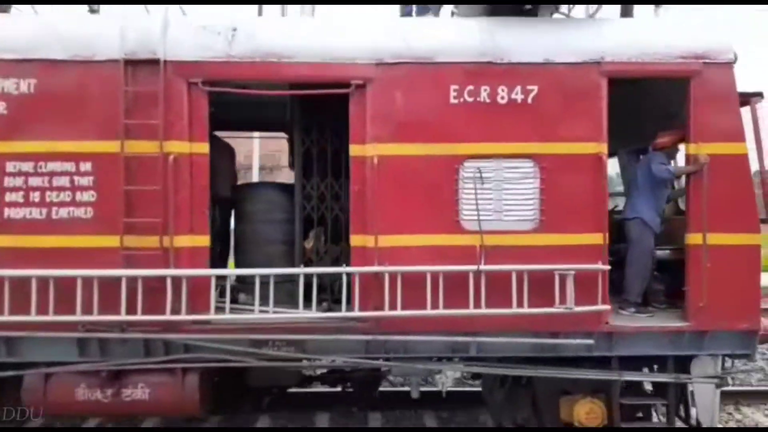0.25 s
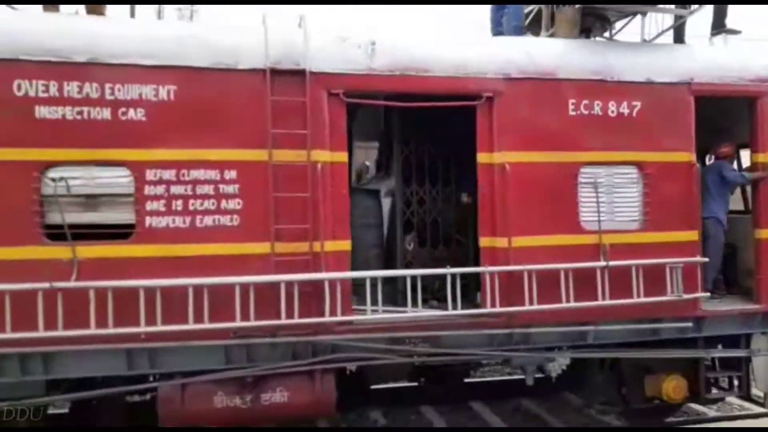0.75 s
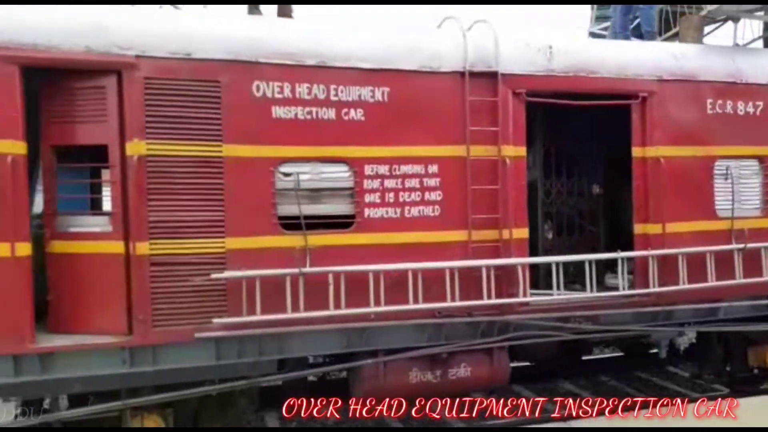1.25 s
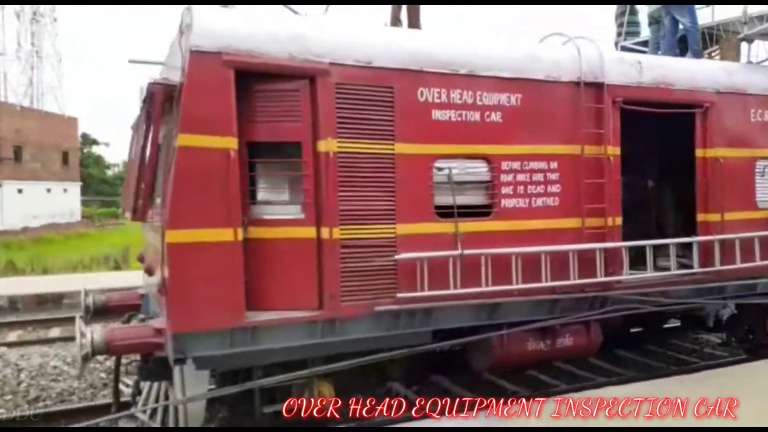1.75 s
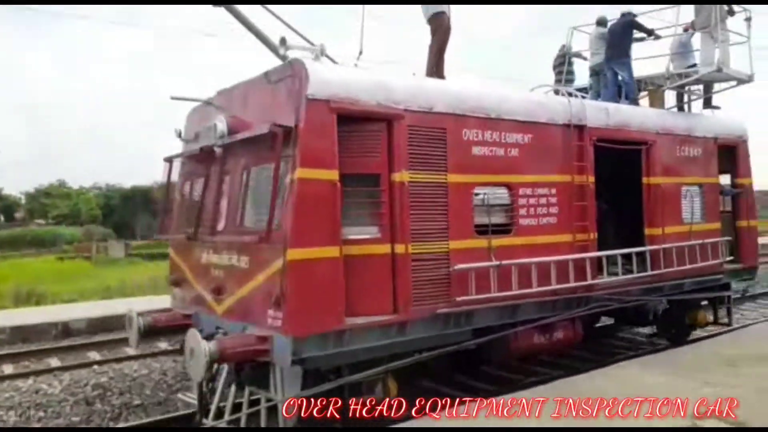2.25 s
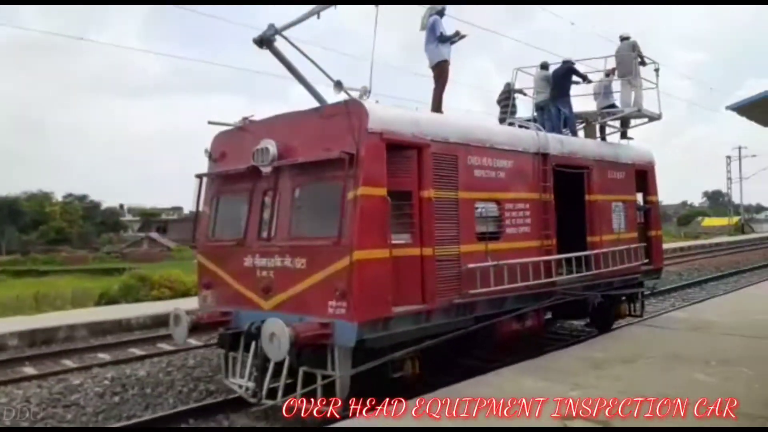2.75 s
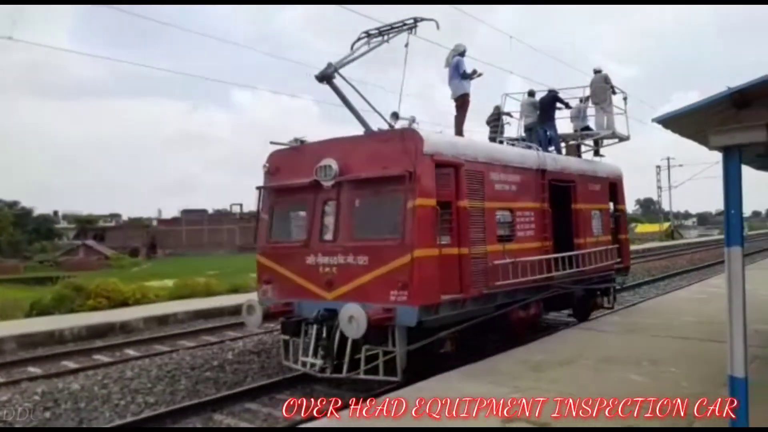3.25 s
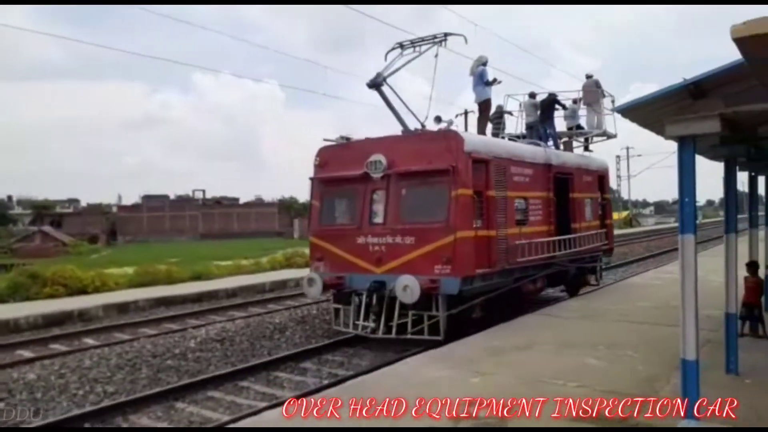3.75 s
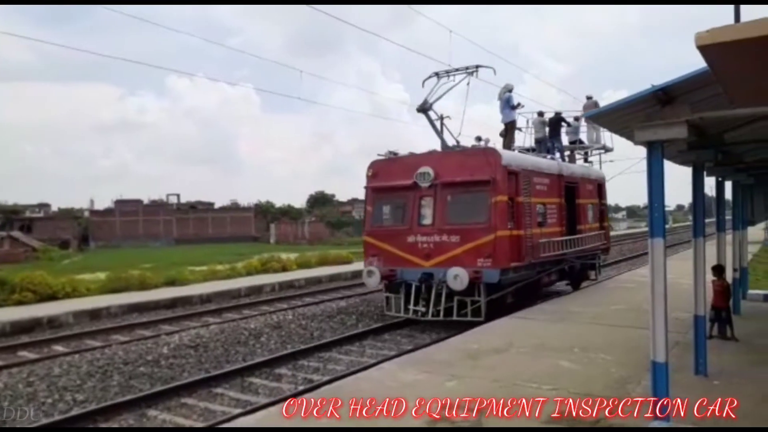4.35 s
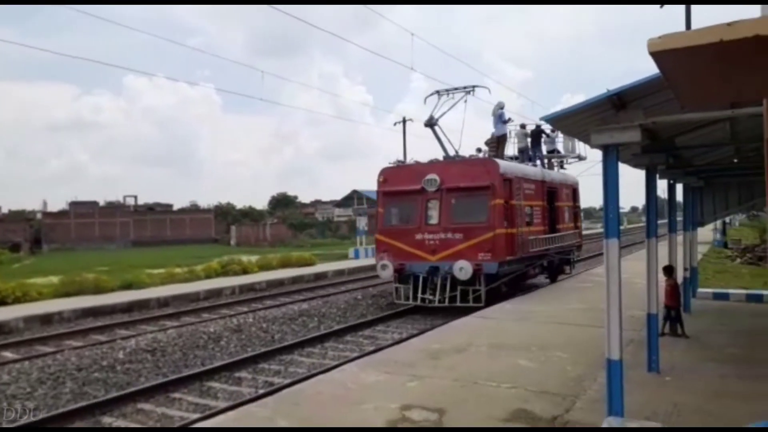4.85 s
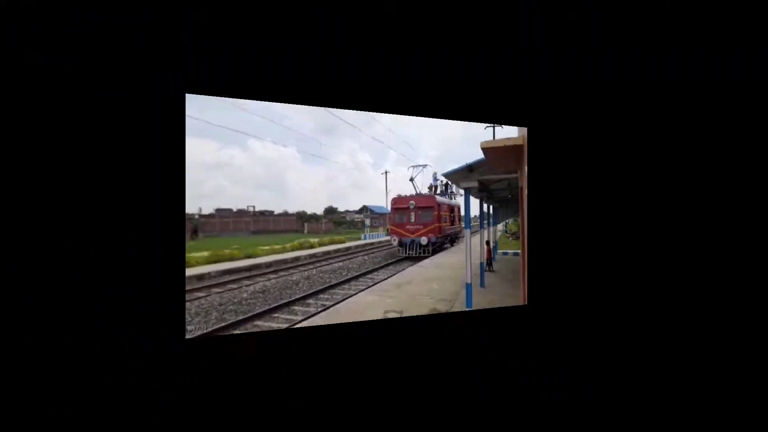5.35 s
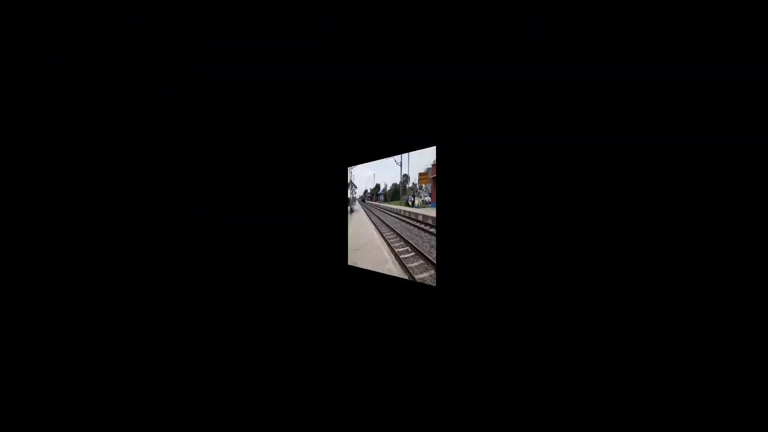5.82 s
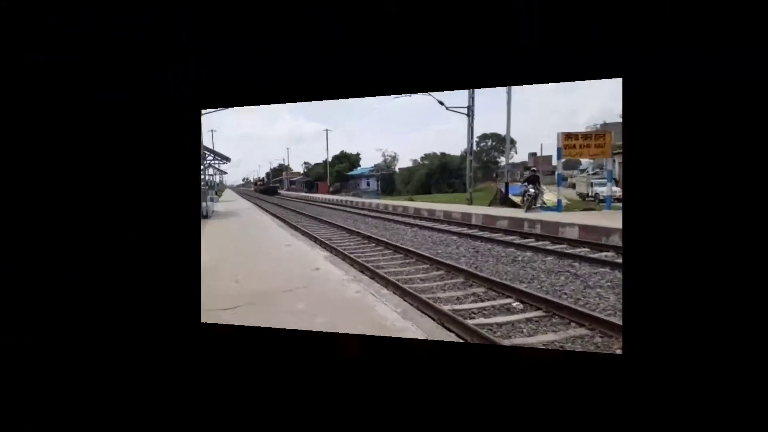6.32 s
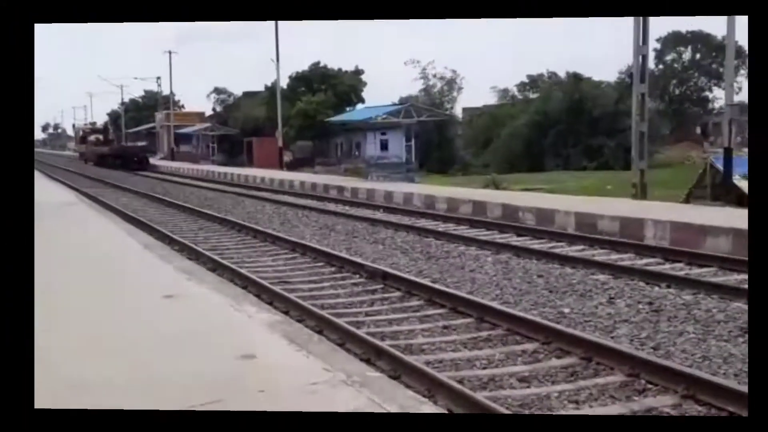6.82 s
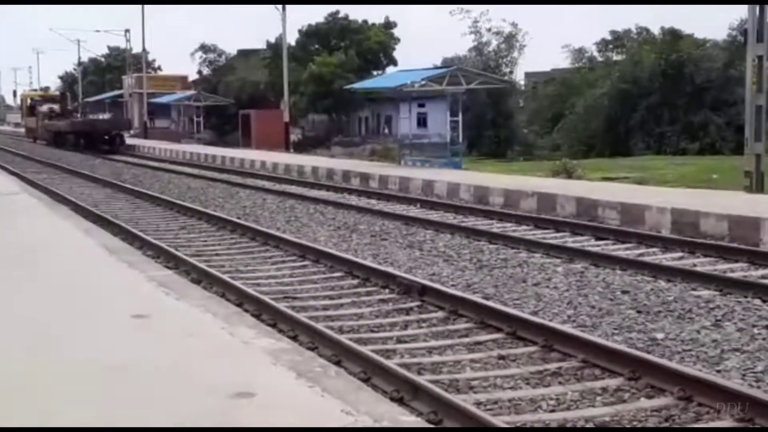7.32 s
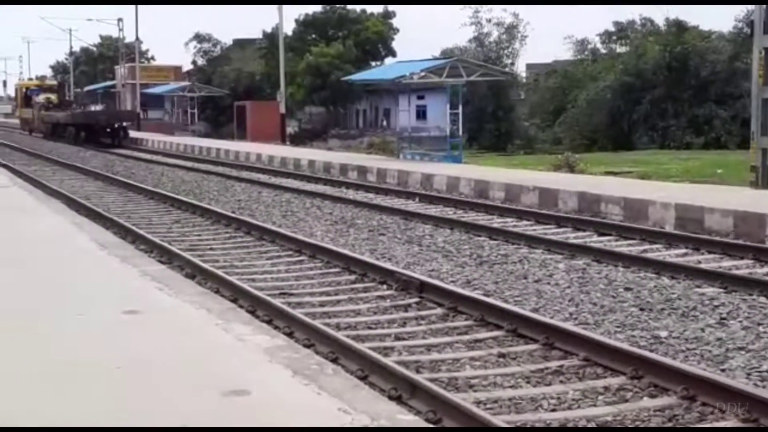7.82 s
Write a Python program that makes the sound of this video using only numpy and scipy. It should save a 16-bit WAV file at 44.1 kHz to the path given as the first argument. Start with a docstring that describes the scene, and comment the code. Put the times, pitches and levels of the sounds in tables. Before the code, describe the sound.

A clattering diesel rail vehicle passes close and recedes into silence, before a distant horn sounds twice over a faint, growing rumble.

```python
"""On a railway platform, a six-cylinder diesel inspection car rolls past and away. Its firing
pulses make the exhaust throb, the engine clatters, and loose steel fittings rattle and tick in
step with the crankshaft. The car fades to silence; then a second machine fades in far down the
line, a horn sounds twice, and the rumble grows as the machine approaches."""
import sys
import numpy as np
from scipy import signal
from scipy.fft import rfft, irfft, next_fast_len
from scipy.io import wavfile
from scipy.ndimage import uniform_filter1d, map_coordinates

SR = 44100
rng = np.random.default_rng(int(sys.argv[2]) if len(sys.argv) > 2 else 0)


def persist_wave(psi):
    """Save psi, clipped to +-1, as 16-bit WAV."""
    counts = np.round(np.clip(psi, -1, 1) * 32767).astype(np.int16)
    wavfile.write(sys.argv[1], SR, np.atleast_2d(counts).T)


N = 356328
TIME = np.arange(N) / SR
TURN_S = .0569  # one crankshaft turn: three firings, half an engine cycle


def amp(db):
    """Decibels to gain."""
    return 10 ** (np.asarray(db) / 20)


def unit(x):
    """Scale to rms 1."""
    return x / np.sqrt(np.mean(x ** 2) + 1e-20)


def along(points, hz):
    """Read (freq_hz, value) points on a log frequency axis."""
    freqs, values = np.transpose(points)
    return np.interp(np.log(hz + 1), np.log(freqs + 1), values)


def curves(rows):
    """One automation curve for each column after the time."""
    times, *columns = np.transpose(rows)
    return [np.interp(TIME, times, column) for column in columns]


def wobble(rate_hz):
    """A smooth random curve through rate_hz points a second."""
    return map_coordinates(rng.standard_normal(int(N * rate_hz / SR) + 4), [TIME * rate_hz])


def filtered(x, response):
    """Equalise x with a gain that depends on frequency."""
    size = next_fast_len(N + SR // 4)
    return irfft(rfft(x, size) * response(np.fft.rfftfreq(size, 1 / SR)), size)[..., :N]


def rush(colour, width, lean, patchy_db):
    """Coloured stereo noise whose bands flicker by about patchy_db; its mid has rms 1."""
    bands = signal.stft(rng.standard_normal((2, N)), nperseg=1024)[2]
    patches = uniform_filter1d(rng.standard_normal(bands.shape[1:]), size=4, axis=0)
    patches = unit(uniform_filter1d(patches, size=10, axis=1))
    mid, side = signal.istft(bands * amp(patchy_db * patches), nperseg=1024)[1][:, :N]
    mid = filtered(mid, lambda hz: amp(along(colour, hz)))
    side = filtered(side, lambda hz: amp(along(colour, hz) + along(width, hz)))
    stereo = np.array([mid + side, mid - side])
    stereo = filtered(stereo, lambda hz: amp(np.outer([.5, -.5], along(lean, hz))))
    return stereo / np.std(stereo.mean(axis=0))


def ring(pitch_hz, width_hz):
    """Noise ringing in one resonance, at rms 1."""
    noise = rng.standard_normal(N)
    return unit(filtered(noise, lambda hz: 1 / (1 + (2 * (hz - pitch_hz) / width_hz) ** 2)))


def resonances(rows):
    """A bank of noisy resonances from (pitch_hz, width_hz, level_db) rows."""
    return sum(amp(db) * ring(hz, width_hz) for hz, width_hz, db in rows)


def bursts(blows, attack_s, t60_s):
    """Envelope of (start_s, level_db) blows that rise quickly and die away."""
    power, t = np.zeros(N + SR), np.arange(SR // 2) / SR
    for start, db in blows:
        blow = amp(db - 60 * t / t60_s) * (1 - np.exp(-t / attack_s))
        power[max(0, round(start * SR)):][:len(t)] += blow ** 2
    return np.sqrt(power[:N])


def throb(cycles, depth, sharpness):
    """A gain of rms 1 that jumps up once a cycle and falls back."""
    return unit(1 + depth * np.exp(-sharpness * (cycles % 1)))


def far_tone(hz, waver_rad, waver_hz):
    """A sine on a pitch curve, its phase shaken by the air on the way."""
    return np.sin(2 * np.pi * np.cumsum(hz) / SR + waver_rad * wobble(waver_hz))


def held(notes, sag_hz_per_s, waver_rad, waver_hz, swell_s=.16):
    """Far tones that swell, hold and fade while their pitch sags."""
    out = np.zeros(N)
    for start, end, hz, db in notes:
        swell = np.clip(np.minimum(TIME - start, end - TIME) / swell_s, 0, 1)
        out += amp(db) * swell * far_tone(hz - sag_hz_per_s * (TIME - start), waver_rad, waver_hz)
    return out


# Faint whines down the line: start_s, peak_s, end_s, pitch_hz, width_hz, level_db
WHINES = [(6.15, 6.85, 7.4, 2285, 45, -71), (6.3, 6.8, 7.15, 4580, 50, -81),
          (5.9, 6.0, 6.17, 1468, 10, -75)]


def whines():
    """Thin, distant bands of noise that swell and fade."""
    return sum(amp(db) * np.interp(TIME, [start, peak, end], [0, 1, 0]) * ring(hz, width_hz)
               for start, peak, end, hz, width_hz, db in WHINES)


# Brief scrapes: peak_s, spread_s, pitch_hz, width_hz, level_db
SCRAPES = [(7.091, 0.045, 11900, 4500, -61), (7.316, 0.056, 4600, 2500, -55.5)]


def scrapes():
    """Short swells of hiss, unrelated in the two ears."""
    out = np.zeros((2, N))
    for peak, spread, hz, width_hz, db in SCRAPES:
        swell = np.exp(-((TIME - peak) / spread) ** 2)
        out += amp(db) * swell * np.array([ring(hz, width_hz), ring(hz, width_hz)])
    return out


# Stereo width of the far machine: freq_hz, side_minus_mid_db
FAR_WIDTH = [(60, -15), (200, -19), (380, -12), (700, -4.5), (1290, 0.5), (4400, 0)]
# Its balance: freq_hz, left_minus_right_db
FAR_BALANCE = [(60, -4), (110, 1.5), (200, 2), (380, 0.0), (700, 2), (1290, 1.5), (2380, 1.5), (4400, 1.5),
               (8120, 7), (15000, -0.5)]


def far_noise(colour, patchy_db):
    """Noise placed in the far machine's stereo image."""
    return rush(colour, FAR_WIDTH, FAR_BALANCE, patchy_db)


# EQ curves of the far engine's rumble, booming body, wheels and hiss: freq_hz, level_db
FAR_RUMBLE_EQ = [(28, -36), (42, -10.5), (65, -4.5), (85, -2), (120, -4.5), (150, -10.5), (185, -5),
                 (215, -19), (300, -32), (600, -71)]
FAR_BODY_EQ = [(140, -26.5), (215, -6), (265, -3.5), (325, 2.5), (390, -2), (445, -8.5), (540, -10.5),
               (680, -13), (1100, -53.5)]
FAR_WHEELS_EQ = [(290, -31), (500, -4), (535, -7), (681, -9), (891, -2), (1240, -5), (1340, -3.5),
                 (1590, -10), (2270, -10.5), (2520, -16), (3030, -24.5), (5000, -18.5), (6500, -54),
                 (11000, -120)]
FAR_HISS_EQ = [(1650, -35), (2800, -1.5), (3570, -3), (4940, -8.5), (5540, -4.5), (7430, -12),
               (9760, -10.5), (12000, -7), (14500, -9), (15600, -20)]


def far_running():
    """Uneven engine rumble, a body that booms more as it nears, wheels on rails, hiss and exhaust."""
    rumble = amp(3.5 + .5 * wobble(11)) * far_noise(FAR_RUMBLE_EQ, patchy_db=1.5)
    body = amp(-1.5 * (TIME[-1] - TIME)) * far_noise(FAR_BODY_EQ, patchy_db=1.5)
    wheels = amp(-2.5) * far_noise(FAR_WHEELS_EQ, patchy_db=2)
    hiss = amp(-14.5) * far_noise(FAR_HISS_EQ, patchy_db=2)
    exhaust_note = amp(3.5) * far_tone(hz=83.2 + 2 * wobble(4), waver_rad=.6, waver_hz=12)
    return rumble + body + wheels + hiss + exhaust_note


# Horn calls, riding on the approach level: start_s, end_s, pitch_hz, gain_db
HORN_CALLS = [(6.1, 7.08, 352.7, 1.5), (7.24, 7.58, 343, -0.5)]


def far_horn():
    """A long call and a short one, each drooping a little in pitch."""
    return held(HORN_CALLS, sag_hz_per_s=11, waver_rad=.17, waver_hz=5.2)


# Swells of engine hum, riding on the approach level: start_s, end_s, pitch_hz, gain_db
HUM_SWELLS = [(5.9, 6.6, 201, -2.5), (6.6, 7.16, 182, 3.5), (7.35, 8.2, 193.6, -1)]


def far_hum():
    """The far engine's hum picks up and sags again."""
    return held(HUM_SWELLS, sag_hz_per_s=21, waver_rad=.3, waver_hz=9.9)


# Fader ride of the far machine coming closer: time_s, level_db
APPROACH = [(5.78, -106), (5.88, -80.5), (6.15, -69.5), (6.55, -62.5), (7.3, -44), (7.75, -41), (8.08, -37)]


def far_machine():
    """Running noise, horn and hum grow together as the second machine approaches."""
    approach_db, = curves(APPROACH)
    return amp(approach_db) * (far_running() + far_horn() + far_hum())


# Stereo width of the inspection car: freq_hz, side_minus_mid_db
CAR_WIDTH = [(60, -31.5), (110, -3), (200, -18.5), (380, -13.5), (700, -6.5), (1290, -0.5), (2380, 1.5),
             (4400, 0)]
# Its balance: freq_hz, left_minus_right_db
CAR_BALANCE = [(200, -0.5), (700, 1.5), (1290, 1.8), (2380, 1.5), (4400, -6.5), (8120, -1), (15000, -4.5)]


def car_noise(colour, patchy_db):
    """Noise placed in the inspection car's stereo image."""
    return rush(colour, CAR_WIDTH, CAR_BALANCE, patchy_db)


def facing(peak_s=1.26, spread_s=.92):
    """How squarely the open side of the engine bay faces the platform, 0 to 1."""
    return np.exp(-((TIME - peak_s) / spread_s) ** 2)


# Resonances heard through the engine louvres: pitch_hz, width_hz, level_db
LOUVRE_MODES = [(963, 170, -36), (1118, 13, -41), (1183, 310, -38)]


def louvres():
    """The open side of the engine bay sweeps past and lets out a howl."""
    return facing() * resonances(LOUVRE_MODES)


# A low groan as the car goes by: time_s, pitch_hz, level_db
GROAN = [(0, 296.8, -21.5), (.14, 228.8, -29.5), (.33, 264, -29), (.51, 305.3, -22.5), (.61, 288, -30.5),
         (.8, 332, -28.5), (.95, 306.5, -29), (1.08, 258, -27), (1.15, 285, -25)]


def groan(release_db_per_s=546.5):
    """One unsteady tone that slides up and down, then cuts away."""
    hz, db = curves(GROAN)
    wavering_hz = hz * (1 + .026 * wobble(90))
    tone = np.sin(2 * np.pi * np.cumsum(wavering_hz) / SR)
    release_db = release_db_per_s * np.maximum(TIME - GROAN[-1][0], 0)
    return amp(db - release_db + 2.6 * wobble(44)) * tone


# Runs of ticking: start_s, end_s, first_level_db, tilt_db_per_khz
TICK_RUNS = [(2.783, 3.01, -30, 0), (3.231, 3.35, -32, 3), (3.46, 3.83, -28, -1), (4.0058, 4.93, -36, -2),
             (5.03, 5.04, -42.5, 7)]
# The ring of the ticking part: pitch_hz, width_hz, gain_db
TICK_MODES = [(4500, 400, -1.5), (4540, 360, 2), (5350, 560, 1.5), (6370, 820, -12.5)]


def ticks(loss_db_per_s=2):
    """A small part, off to the right, is struck once an engine cycle; each tick has its own colour."""
    blows = [(s, db - loss_db_per_s * (s - start), tilt)
             for start, end, db, tilt in TICK_RUNS for s in np.arange(start, end, 2 * TURN_S)]
    tilt_scatter = 4.5 * rng.standard_normal(40)
    out = np.zeros(N)
    for mode_hz, width_hz, mode_db in TICK_MODES:
        above_pivot_khz = (mode_hz - 5000) / 1000
        scatter_db = 1.5 * rng.standard_normal(40)
        strikes = [(s, db + mode_db + (tilt + extra_tilt) * above_pivot_khz + extra_db)
                   for (s, db, tilt), extra_tilt, extra_db in zip(blows, tilt_scatter, scatter_db)]
        out += bursts(strikes, attack_s=.002, t60_s=.026) * ring(mode_hz, width_hz)
    return out * amp([[-12], [-.5]])


# Spells of steel chatter: start_s, end_s, level_db, third_stroke_dip_db
CHATTER_SPELLS = [(2.663, 3.01, -30, 7.5), (3.0822, 3.195, -26, -1.5), (3.234, 3.963, -38.5, 4.5),
                  (4.0058, 4.93, -52, 6), (4.972, 5.035, -43.5, 8.5)]
# Its EQ curve: freq_hz, level_db
CHATTER_EQ = [(1200, -24.5), (3000, -5), (4400, 2), (6300, 2), (9000, -5), (12500, -1), (15500, -9.5)]


def chatter(edge_dip_db=3.5):
    """Loose steel takes one dry stroke a firing, in spells that swell and ebb."""
    blows = []
    for start, end, db, dip_db in CHATTER_SPELLS:
        for stroke, s in enumerate(np.arange(start, end, TURN_S / 3)):
            edge = (2 * (s - start) / (end - start) - 1) ** 2
            blows.append((s, db - edge_dip_db * edge - dip_db * (stroke % 3 == 2)))
    return bursts(blows, attack_s=.00065, t60_s=.04) * car_noise(CHATTER_EQ, patchy_db=2.5)


# The hardest shakes of the fittings: start_s, level_db
HARD_SHAKES = [(0.2853, -31.5), (0.3421, -35.5), (0.399, -28.5), (0.6259, -26.5), (0.7379, -27.5),
               (0.965, -23.5), (1.0223, -23.5), (1.0794, -24), (1.1916, -23.5), (1.2501, -27),
               (1.4795, -28.5), (1.7075, -34), (1.934, -31.5), (2.0487, -34), (2.3925, -34.5),
               (2.8504, -31), (3.4785, -35), (3.709, -41), (4.0243, -44)]
# Their EQ curve: freq_hz, level_db
RATTLE_EQ = [(900, -31.5), (2500, 0), (4500, -2.5), (7000, -2), (9000, -3.5), (12500, 2.5), (15500, -3.5)]


def rattle(near_until_s=2.5, light_db=-32, loss_db_per_s=6):
    """Sizzling steel: a light shake on every crankshaft turn while the car is near, plus hard ones."""
    times = np.arange(0, near_until_s, TURN_S)
    scatter_db = 1.5 * rng.standard_normal(100)
    light_shakes = [(s, light_db - loss_db_per_s * s + db) for s, db in zip(times, scatter_db)]
    envelope = bursts(light_shakes + list(HARD_SHAKES), attack_s=.0017, t60_s=.22)
    return envelope * car_noise(RATTLE_EQ, patchy_db=4)


def fittings():
    """Loose steel rattles close by and chatters further on, roughened by a fine grain."""
    return (rattle() + chatter()) * unit(amp(1.7 * wobble(900)))


# EQ curve of the car's body: freq_hz, level_db
BODY_EQ = [(25, -24), (45, -9), (90, -1), (150, -1.5), (205, -4.5), (235, -3), (280, -4), (330, -1.5),
           (390, -2.5), (425, -8), (560, -12), (750, -23), (1500, -57.5)]


def body_rumble(turns):
    """The body rumbles, pulsing once a crankshaft turn."""
    return car_noise(BODY_EQ, patchy_db=.5) * throb(turns, depth=.3, sharpness=3)


# EQ curve of the combustion clatter: freq_hz, level_db
CLATTER_EQ = [(300, -36.5), (470, -4), (590, -9.5), (680, 2), (820, -2.5), (970, -1.5), (1130, -8.5),
              (1430, -9.5), (1900, -12), (2200, -14), (3400, -19.5), (4500, -27.5), (6000, -43.5),
              (9100, -49.5)]


def clatter(turns):
    """Combustion noise, broken into small uneven knocks by the valve gear and injectors."""
    combustion = car_noise(CLATTER_EQ, patchy_db=2) * throb(turns, depth=.26, sharpness=1.5)
    return amp(-.7) * unit(combustion * amp(1.6 * wobble(220)))


# Resonances of the engine casing and gears: pitch_hz, width_hz, gain_db
CASING_MODES = [(750, 92, -20.5), (812.4, 15, -13), (893, 16, -16), (1286, 72, -18.5), (1628, 70, -19.5),
                (1807, 62, -18), (1892, 23, -23.5), (2033, 35, -21)]


def casing(sink_from_s=2.8, sink_per_s=.03):
    """The casing rings, its pitch sinking as the car draws away."""
    speed = 1 - sink_per_s * np.maximum(TIME - sink_from_s, 0)
    return map_coordinates(resonances(CASING_MODES), [np.cumsum(speed) - 1], order=3)


# Resonances of the thin steel covers: pitch_hz, width_hz, gain_db
COVER_MODES = [(3490, 420, -18.5), (4390, 450, -21.5)]


def cover_rasp(fired):
    """The covers rasp unevenly with each firing, off to the right."""
    ringing = resonances(COVER_MODES)
    shaking = unit(amp(3 * wobble(18)) * throb(fired, depth=.26, sharpness=5))
    return ringing * shaking * amp([[-6], [3]])


# EQ curve of the engine's hiss: freq_hz, level_db
HISS_EQ = [(1650, -18.5), (2800, -1), (3500, -4.5), (3900, -3.5), (4400, -1.5), (5870, -5.5), (9350, -8.5),
           (11900, -7.5), (14900, -16.5), (15600, -15.5)]


def engine_hiss(turns, fired):
    """A grainy hiss that spits on every turn and pulses with every firing."""
    pulse = throb(turns, depth=.44, sharpness=11) * throb(fired, depth=.31, sharpness=2.6)
    return car_noise(HISS_EQ, patchy_db=2.8) * pulse * unit(amp(.44 * wobble(260)))


def machinery(fired, engine_db, beside_db=-27):
    """The engine's noise layers, each falling away with distance at its own rate."""
    lost_db = beside_db - engine_db
    turns = (fired + .3) / 3
    body = amp(beside_db - 1.075 * lost_db) * body_rumble(turns)
    metal = clatter(turns) + amp(2.5 - .15 * lost_db) * casing() + cover_rasp(fired)
    hiss = amp(-36.5 - .88 * lost_db) * engine_hiss(turns, fired)
    return body + amp(engine_db) * metal + hiss


# Exhaust harmonics, every sixth a multiple of the firing rate: engine_cycle_multiple, gain_db
EXHAUST_HARMONICS = [(5, -26), (6, 2.5), (7, -25.5), (8, -6), (9, -16), (10, -15.5), (11, -21.5), (12, 2),
                     (13, -25), (14, -14), (15, -26.5), (16, -17.5), (17, -30), (18, -8), (20, -30.5),
                     (22, -27.5), (23, -21), (24, -23.5)]


def exhaust(fired, boom_db, bark_db):
    """Firing harmonics line up into pulses; unequal cylinders add weaker lines between them."""
    out = np.zeros(N)
    for order, db in EXHAUST_HARMONICS:
        between = order % 6 != 0
        slip = .018 * max(order - 12, 0) * TIME  # upper harmonics turn slowly against the lower
        cycles = order * fired / 6 + between * rng.random() + slip
        bark_share = np.interp(order, [9, 12, 18], [0, 1, .5])
        facing_db = 1.5 * facing() * (order > 12)  # brighter as the open engine bay passes
        level_db = boom_db + bark_share * (bark_db - boom_db) + facing_db
        waver_db = (.45 + between) * wobble(7)
        out -= amp(level_db + db + waver_db) * np.cos(2 * np.pi * cycles)
    return out * amp([[.2], [-.2]])


# Engine speed: time_s, firing_rate_hz
FIRING_RATE = [(0, 53.2), (1.6, 53.0), (2.4, 52.7), (4, 52.8), (5.4, 52.45)]
# Fader rides of the pass-by: time_s, exhaust_boom_db, exhaust_bark_db, engine_noise_db
PASS_BY = [(0, -23, -19, -28.0), (0.3, -21, -19.0, -26), (0.7, -19.5, -17.5, -27.5), (1.0, -23.5, -17, -27),
           (1.3, -23, -20, -27), (1.7, -25.5, -19, -28), (2.0, -24.5, -20.5, -29.5), (2.4, -25, -21.5, -32),
           (2.7, -23.5, -23, -32.5), (3.1, -22.5, -28, -35.5), (3.5, -26.0, -30.0, -37),
           (3.9, -28.5, -31, -40.5), (4.15, -31, -34.5, -45), (4.4, -31.5, -31, -46.5),
           (4.8, -40, -38, -51), (5.15, -43, -43.5, -56.5)]


def inspection_car():
    """The diesel car passes and draws away, its firing driving both exhaust and engine noise."""
    firing_hz, = curves(FIRING_RATE)
    fired = np.cumsum(firing_hz) / SR - .41  # firing count; whole numbers fall on exhaust pulses
    boom_db, bark_db, engine_db = curves(PASS_BY)
    engine = exhaust(fired, boom_db, bark_db) + machinery(fired, engine_db)
    return engine + louvres() + groan() + fittings() + ticks()


def scene():
    """The inspection car fades to silence, then the second machine comes in."""
    fade_start_s, fade_end_s = 5.165, 5.69
    fade = np.clip((fade_end_s - TIME) / (fade_end_s - fade_start_s), 0, 1) ** 2.43
    return fade * inspection_car() + far_machine() + whines() + scrapes()


def record(dry):
    """A brick-wall low-pass trims the very top of the treble."""
    return filtered(dry, lambda hz: hz < 15750)


dry = scene()
out = record(dry)
persist_wave(out)
```